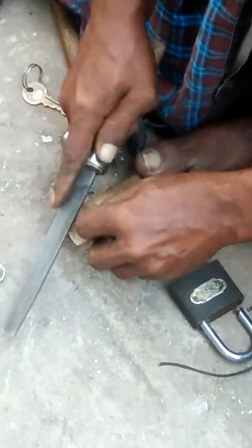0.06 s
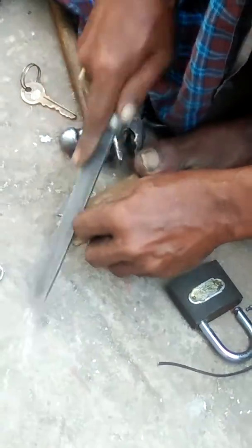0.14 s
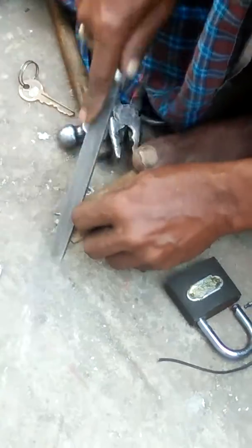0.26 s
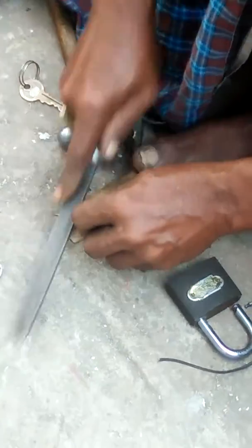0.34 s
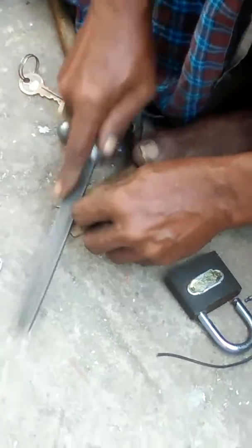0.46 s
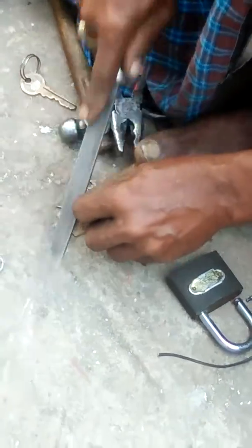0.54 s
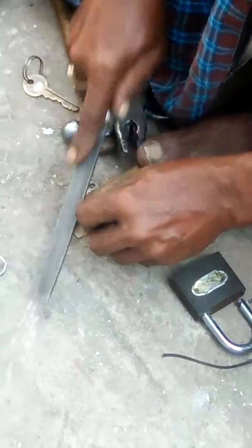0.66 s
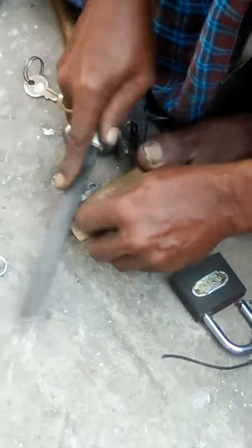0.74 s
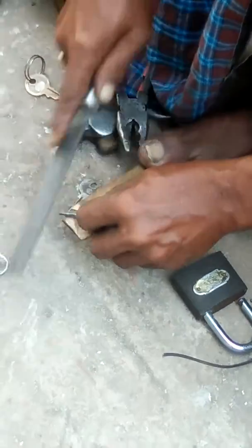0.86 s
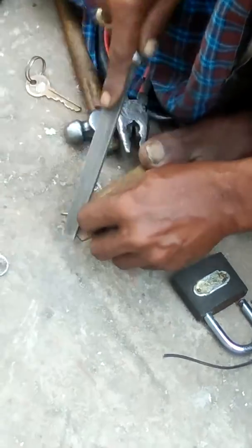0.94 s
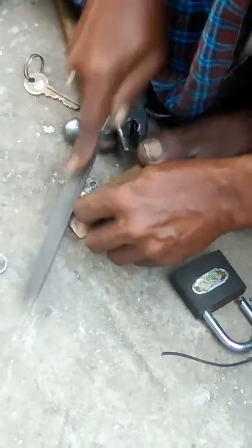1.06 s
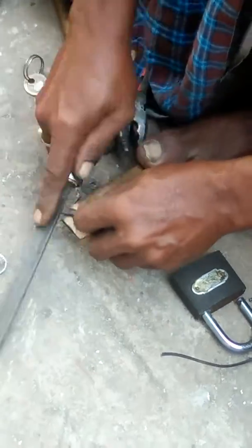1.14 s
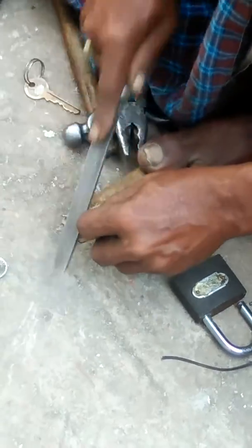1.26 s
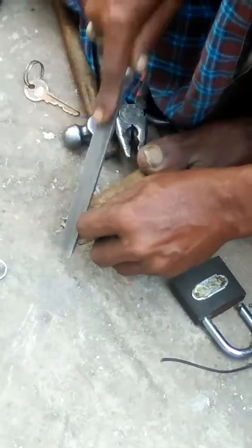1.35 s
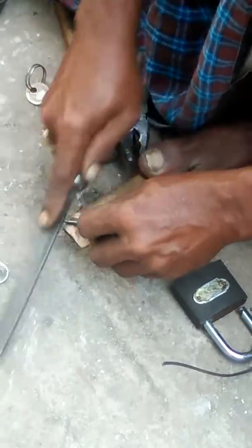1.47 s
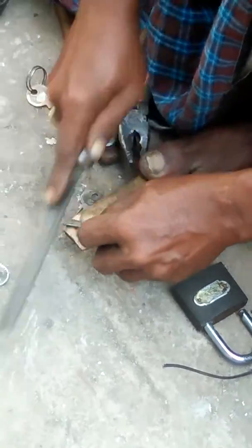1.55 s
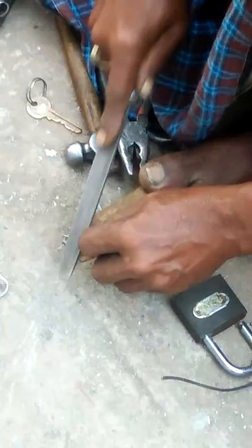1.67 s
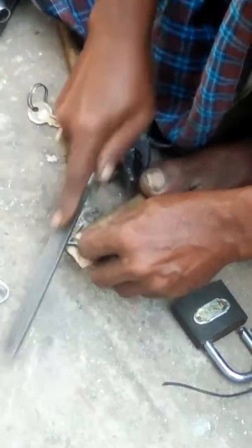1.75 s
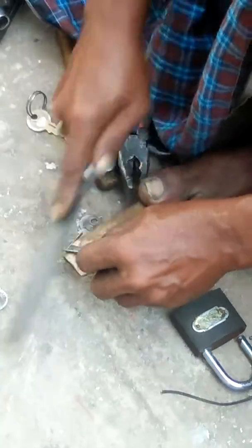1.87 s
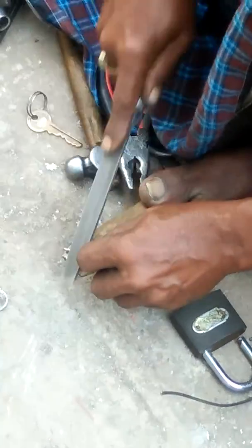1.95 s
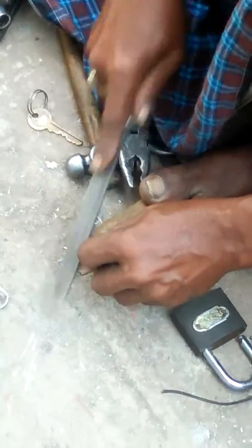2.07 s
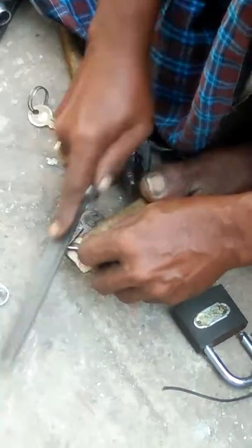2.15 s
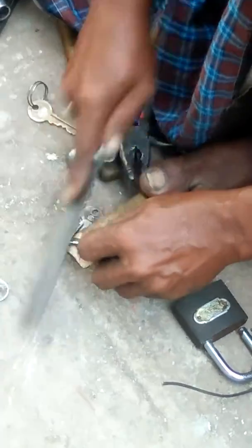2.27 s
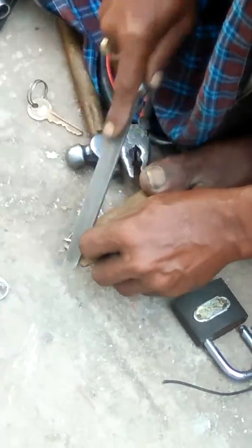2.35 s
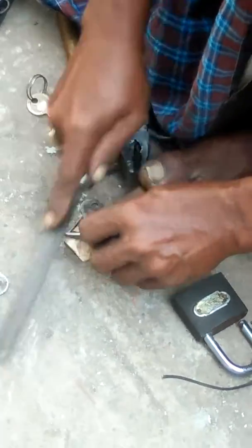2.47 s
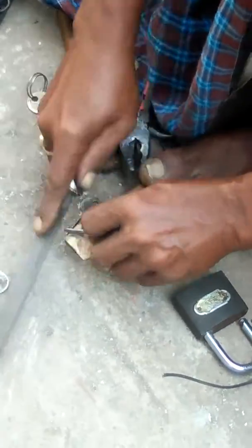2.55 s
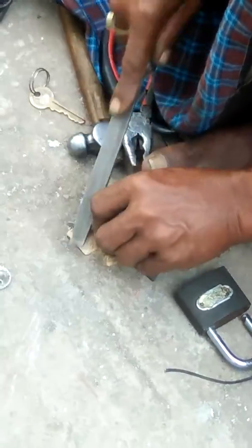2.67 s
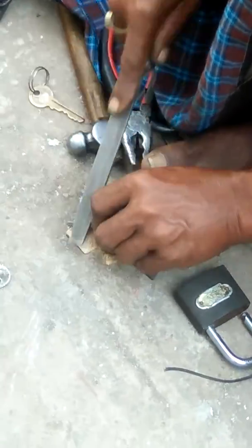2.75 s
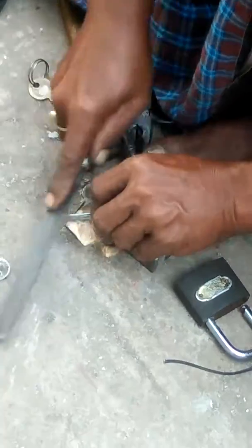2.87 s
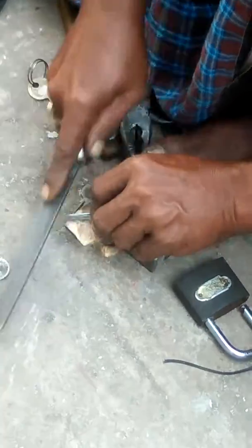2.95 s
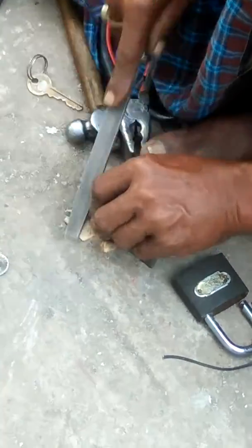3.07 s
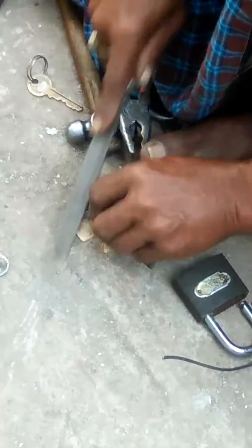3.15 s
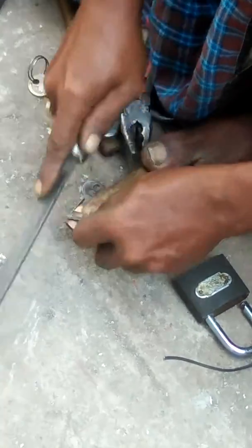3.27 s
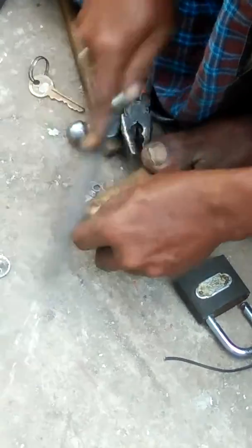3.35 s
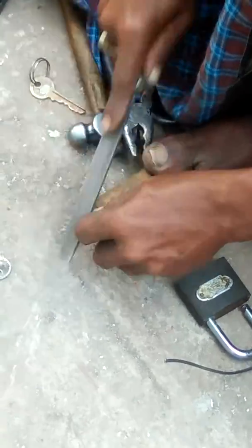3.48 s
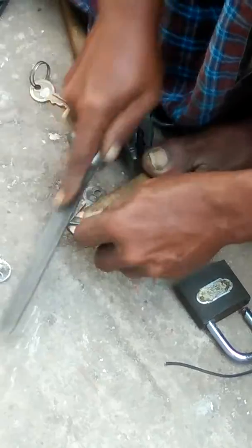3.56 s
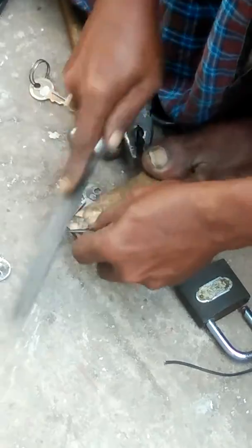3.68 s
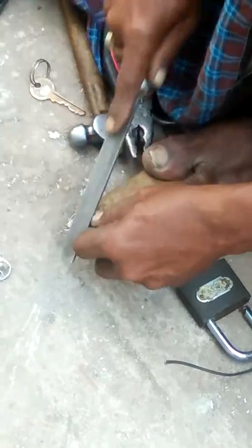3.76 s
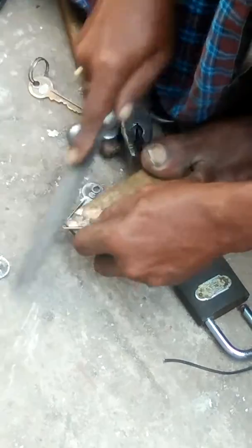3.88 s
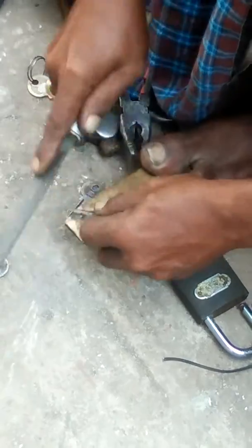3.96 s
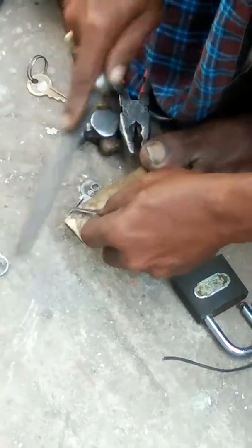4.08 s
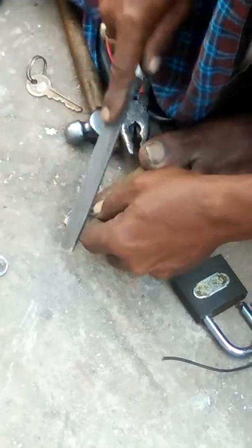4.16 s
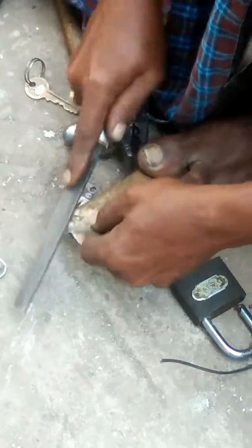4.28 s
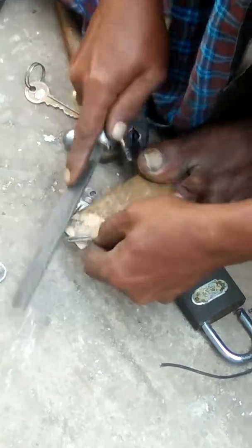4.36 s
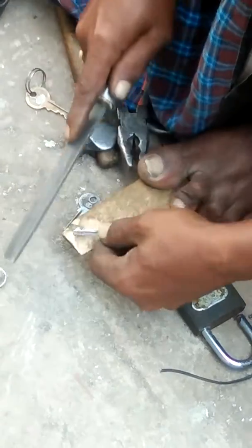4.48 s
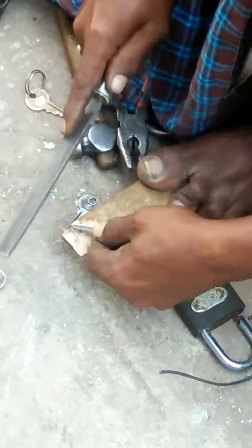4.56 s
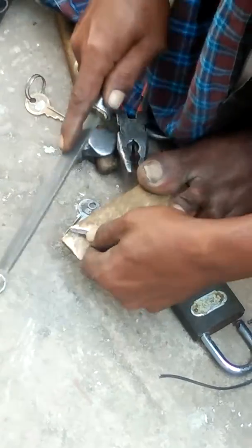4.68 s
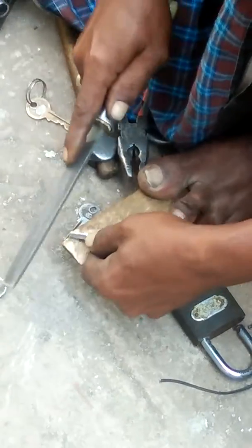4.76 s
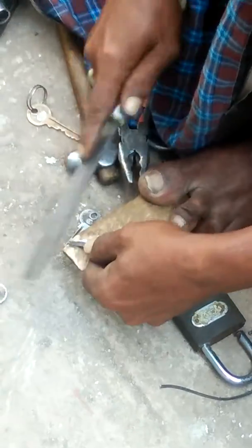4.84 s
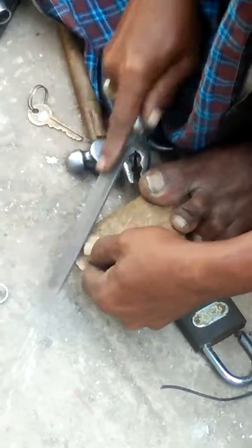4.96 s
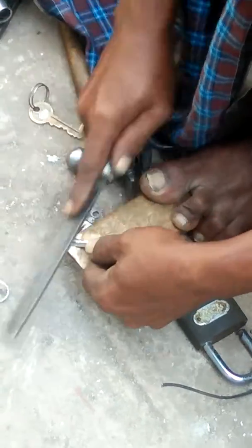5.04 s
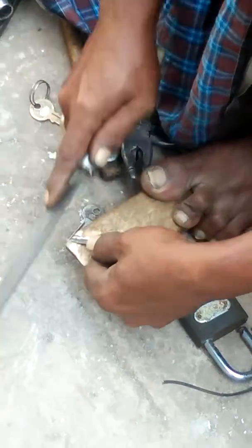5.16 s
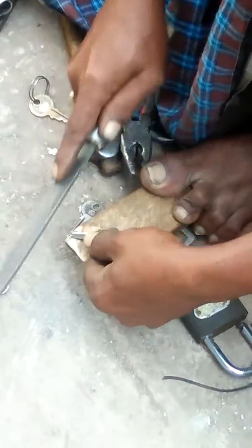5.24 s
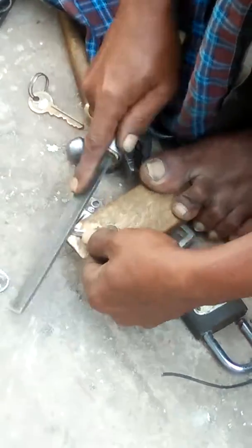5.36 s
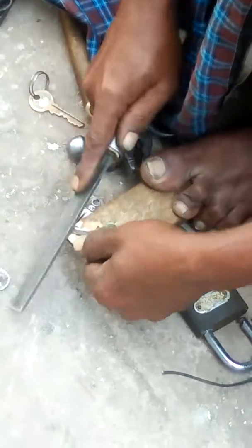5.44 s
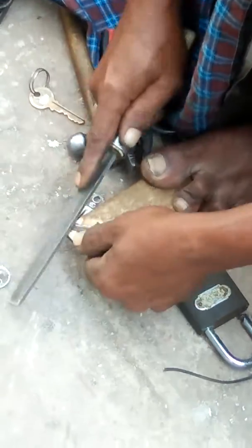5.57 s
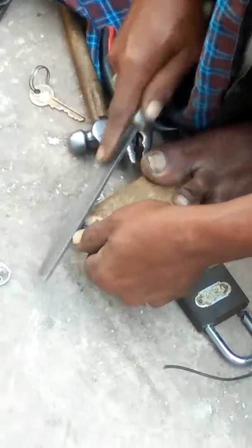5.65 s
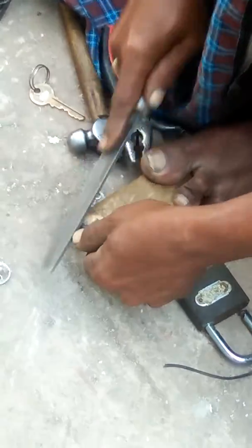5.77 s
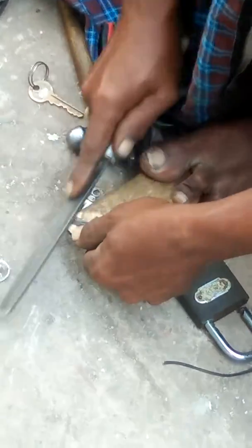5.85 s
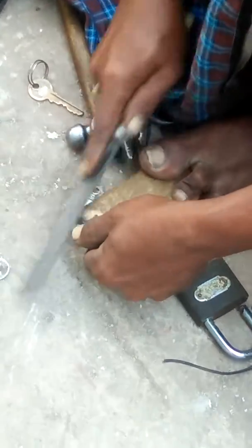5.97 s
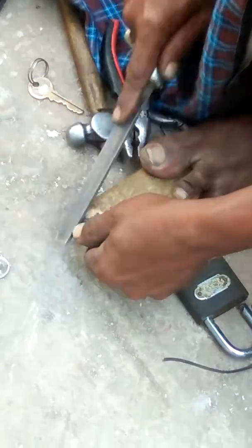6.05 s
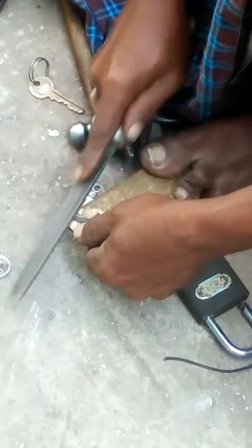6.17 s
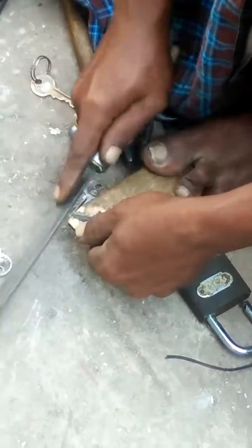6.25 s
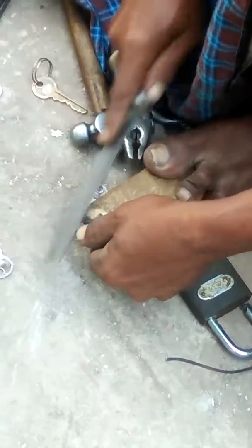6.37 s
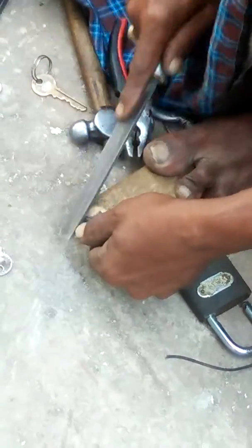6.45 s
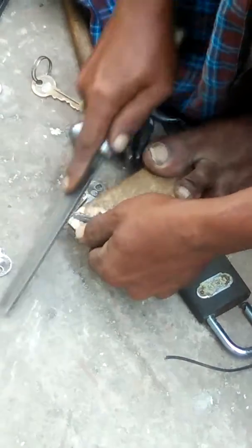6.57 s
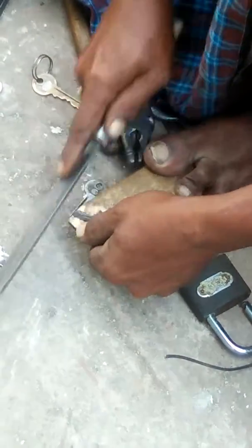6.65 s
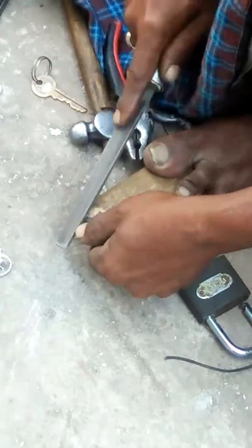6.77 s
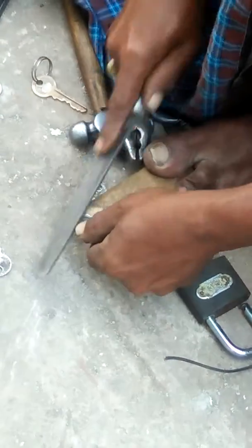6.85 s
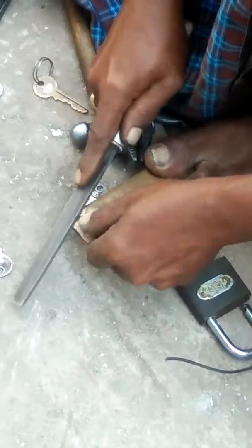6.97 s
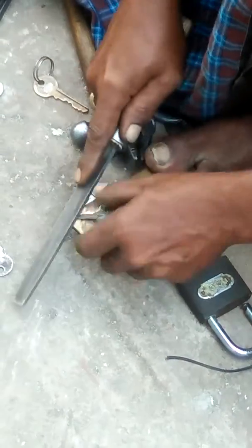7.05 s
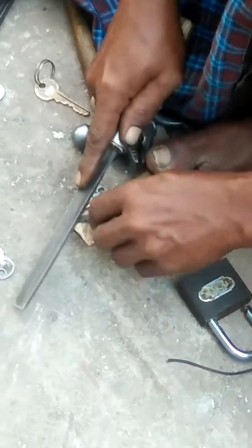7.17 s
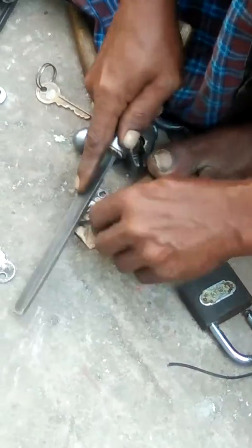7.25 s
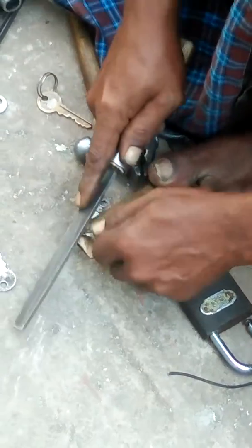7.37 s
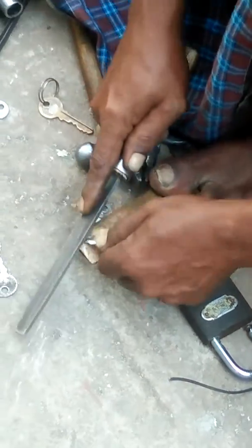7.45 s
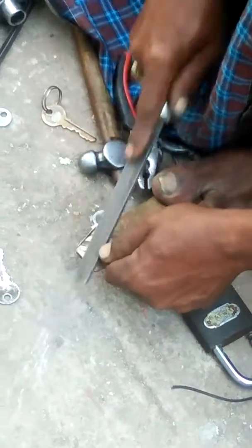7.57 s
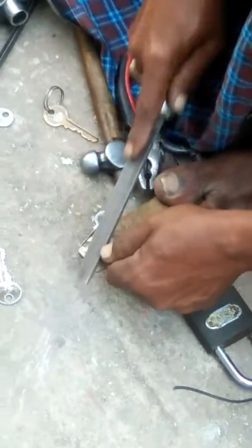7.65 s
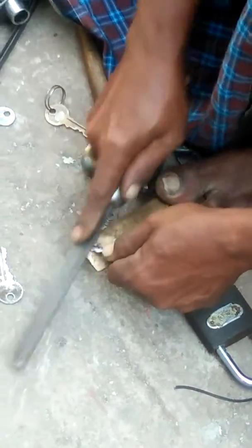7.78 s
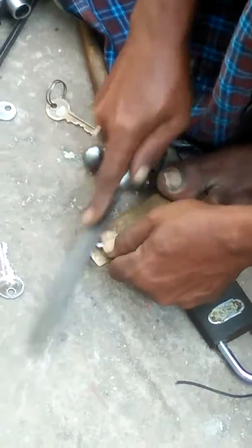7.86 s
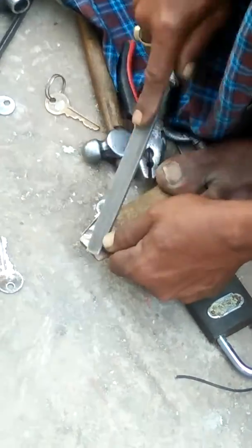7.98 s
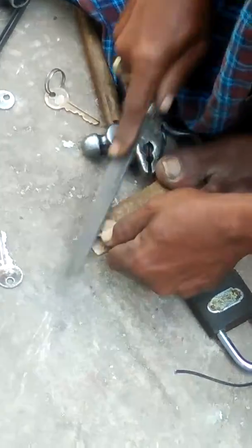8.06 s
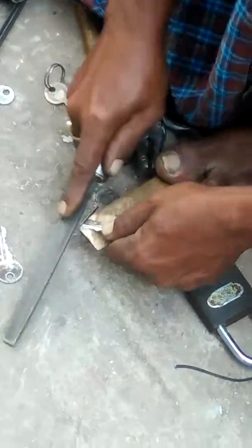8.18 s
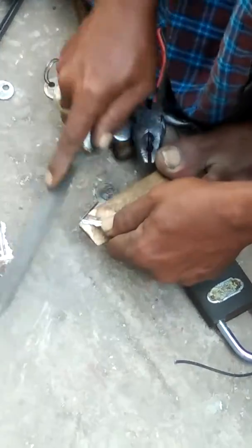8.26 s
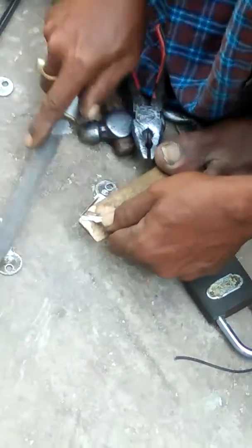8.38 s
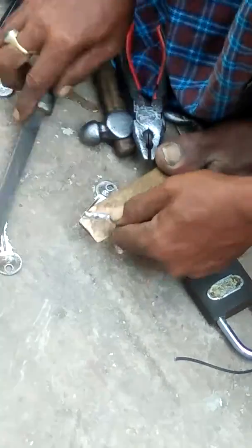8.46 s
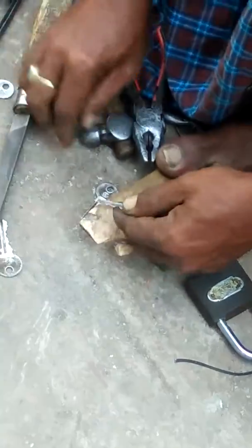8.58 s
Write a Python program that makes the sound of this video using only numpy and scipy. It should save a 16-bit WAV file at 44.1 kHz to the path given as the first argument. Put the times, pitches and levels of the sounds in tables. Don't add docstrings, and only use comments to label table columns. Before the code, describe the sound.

Close, dry hand filing of a thin metal key: fast scratchy strokes, growing sparser and softer, small clicks, then a tiny tinkle of loose keys.

```python
import sys
import numpy as np
from scipy import signal
from scipy.fft import rfft, irfft, next_fast_len
from scipy.io import wavfile
from scipy.ndimage import uniform_filter1d, map_coordinates

SR = 44100
rng = np.random.default_rng(int(sys.argv[2]) if len(sys.argv) > 2 else 0)


def invert_db(x):
    u = np.asarray(x, float) / 20
    return 10 ** u


def wav_out(sig):
    wavfile.write(sys.argv[1], SR, np.round(np.clip(np.atleast_2d(sig).T, -1, 1) * 32767).astype(np.int16))


N = 380141
T = np.arange(N) / SR

# f/Hz, level/dB per Hz
STREET_SPECTRUM = [(120, -21.5), (200, -14), (310, -7), (380, -14), (460, -2.5), (530, -16), (600, -2),
                   (1300, -2.5), (1600, -4.5), (2000, -6.5), (2600, -19), (4200, -32), (14500, -55)]
# f/Hz, level/dB per Hz
RUMBLE_SPECTRUM = [(12, -48.5), (20, -24), (30, -16), (64, -4.5), (134, -15.5), (200, -23.5), (260, -36.5),
                   (340, -44), (570, -120)]
# f/Hz, level/dB
HUM_LINES = [(300, -84), (460, -83), (590, -81), (790, -82), (1000, -83), (1200, -82), (1600, -83)]
# t/s, f/Hz, level/dB
WHINE_PATH = [
    (6.8, 1458, -82),
    (7.0, 1455, -82),
    (7.6, 1437, -87),
    (7.9, 1500, -85),
]
# t/s, level/dB
ENGINE_LEVEL = [
    (0, -47.5),
    (.05, -50),
    (.12, -46),
    (.3, -43),
    (.55, -52),
    (.8, -51),
]
# f/Hz, width/Hz, level/dB
EXHAUST_MODES = [(744, 23, 1.5), (900, 110, -9), (1500, 146, -9), (1625, 37, -1.5), (2463, 62, -18.5),
                 (4200, 900, -34)]
# t/s, level/dB
TRAFFIC_LEVEL = [(0.0, -73), (3.53, -74), (4.54, -79), (4.95, -79.5), (5.7, -75.5), (6.67, -72),
                 (7.25, -78.5), (7.45, -76.5), (7.6, -77), (8.0, -73), (8.62, -80.5)]
# t/s, level/dB
GUST_LEVEL = [(0.0, -83), (0.41, -63), (0.43, -55), (0.53, -70), (0.55, -61), (0.96, -79), (1.22, -71),
              (2.59, -76.5), (2.71, -69), (3.31, -79), (3.43, -67.5), (3.89, -76), (3.94, -62),
              (4.59, -81.5), (7.06, -71), (7.42, -78), (8.43, -70), (8.62, -85)]
# f/Hz, t60/s
YARD_T60 = [(500, 0.34), (1200, 0.41), (3000, 0.34), (5000, 0.24), (7000, 0.17), (14000, .13)]
# f/Hz, side minus mid/dB
SIDE_SPREAD = [(200, -68), (700, -80), (3000, -80), (4600, -36), (5600, -16), (7000, -7), (14000, -9)]
# f/Hz, level/dB per Hz
HISS_SPECTRUM = [(3000, -33), (5000, -17), (7000, -5.5), (10000, 0), (14500, -9)]
# t/s, peak/dB
TINKLES = [
    (8.518, -35.5),
    (8.534, -37),
    (8.54, -37.5),
    (8.551, -42),
    (8.558, -44),
    (8.564, -46),
    (8.569, -42.5),
    (8.578, -50),
]
# f/Hz, t60/s, level/dB
LOOSE_KEY_MODES = [(2930, 0.014, 9.5), (3180, .015, 3), (4000, 0.027, -10), (5230, 0.015, -18),
                   (7195, .025, -26.5), (9100, 0.015, -18)]
# t/s, f/Hz, level/dB, t60/s
RINGS = [
    (6.508, 7195, -51, .16),
    (6.508, 12350, -66, .06),
    (6.506, 9600, -66, .04),
    (6.866, 7195, -53, .12),
    (6.864, 9900, -64, .07),
    (6.864, 12400, -70, .05),
    (8.545, 9560, -64, .15),
    (8.556, 7195, -69, .2),
]
# t/s, peak/dB, then block, edge, swarf minus peak/dB
TAPS = [(0.1607, -26.5, 1.5, -5, -10.5), (0.6044, -25, -15, -5, -13), (1.065, -19, -21, -11, -24),
        (1.738, -20, -5, -8, -20.5), (2.0843, -22, -31, -6, -17.5), (2.8046, -28.5, 5.5, -5, -30.5),
        (3.5543, -18, -11, -13, -14), (3.903, -20, -19, -4, -21), (4.3214, -28, 7.5, -28, -28),
        (5.0764, -33.5, 13, -28.5, -28), (5.5271, -24, 8.5, -21, -31.5), (6.1364, -36, -19, -0.5, -12),
        (6.1729, -33, 0, -21, -32), (6.5005, -34.5, -16, -4, -8.5), (6.573, -25, -22, -18, -20),
        (6.7424, -25, 0, -18, -33), (6.7512, -21, -28, -24, -32), (6.8414, -37, -11, 3, -23),
        (6.861, -34.5, -15, -0.5, -5), (6.9111, -16.5, 1.5, -12, -24.5)]
# f/Hz, width/Hz, level/dB
BLOCK_MODES = [(803, 120, 3.5), (1033, 236, 5), (1212, 76, -1.5), (1390, 300, -2)]
# f/Hz, width/Hz, level/dB
KEY_MODES = [(1910, 170, -6), (2230, 150, -5), (2600, 220, -3), (2970, 260, -.5), (3300, 210, -4.5)]
# f/Hz, width/Hz, level/dB
TIP_MODES = [(3720, 180, -4), (3950, 220, 0.8), (4300, 220, -2)]
# f/Hz, width/Hz, level/dB
EDGE_MODES = [(4550, 260, 0.5), (4775, 161, 4), (5100, 130, -1.5), (5790, 180, -5.5)]
# f/Hz, width/Hz, level/dB
SWARF_MODES = [(6130, 189.6, 5.5), (6590, 460, 5), (7074, 260, -3), (8700, 530, -5.5), (10490, 550, -6),
               (11400, 400, -11), (13100, 900, -9)]
# start/s, end/s, from/Hz, to/Hz, level/dB
SINGING = [(0.232, 0.29, 940, 1230, -30.5), (0.403, 0.444, 1002, 1300, -31),
           (0.473, 0.538, 1997, 1540, -25.5), (0.583, 0.64, 1037, 923, -29),
           (0.757, 0.824, 1066, 1430, -29), (1.348, 1.411, 1011, 1120, -23),
           (1.503, 1.562, 4810, 5100, -27), (2.546, 2.604, 4670, 5000, -23), (5.95, 6.03, 4730, 4800, -41),
           (1.85, 1.895, 4750, 4980, -26), (2.192, 2.263, 4803, 5170, -28.5),
           (2.551, 2.644, 1500, 1960, -39.5), (3.01, 3.05, 2290, 2334, -21.5),
           (3.309, 3.359, 1166, 1534, -21.5), (3.649, 3.738, 900, 1993, -29.5),
           (4.377, 4.447, 972, 1250, -29.5), (7.674, 7.738, 802, 1018, -27.5),
           (7.841, 7.903, 900, 1147, -28.5), (1.557, 1.625, 5060, 4950, -35), (1.75, 1.81, 1006, 1250, -32),
           (2.09, 2.135, 2850, 2950, -25.5), (2.42, 2.516, 1323, 1250, -30), (2.745, 2.804, 590, 610, -51),
           (2.898, 2.967, 1250, 1420, -25.5), (3.062, 3.104, 2320, 2290, -37),
           (5.82, 5.885, 1050, 1250, -40), (6.278, 6.335, 4650, 4750, -36), (6.35, 6.395, 1250, 1320, -34),
           (7.85, 7.96, 4730, 4850, -42), (8.221, 8.3, 4700, 4780, -41), (8.201, 8.3, 945, 1250, -34),
           (0.292, 0.345, 900, 860, -29), (3.172, 3.21, 1250, 953, -32.5), (3.66, 3.69, 4800, 4840, -38),
           (3.73, 3.77, 1250, 947, -30), (6.69, 6.74, 1050, 1000, -33), (6.65, 6.7, 4600, 4690, -40),
           (3.555, 3.61, 2700, 2807, -38)]
# lands/s, loudest/s, lifts/s, key/dB,
# block minus key/dB
DRAWS = [(0.19, 0.253, 0.38, -27.5, -4.5), (0.543, 0.618, 0.74, -27.5, -5.5),
         (1.07, 1.077, 1.128, -32, -9.5), (1.337, 1.349, 1.479, -27.5, -9.5),
         (1.728, 1.751, 1.832, -26, -5.5), (2.075, 2.099, 2.156, -24, -6),
         (2.416, 2.428, 2.515, -22.5, -17.5), (2.806, 2.811, 2.897, -27.5, -16),
         (3.168, 3.179, 3.262, -30.5, -3), (3.545, 3.571, 3.66, -33.5, -2.5),
         (3.893, 3.913, 3.975, -31.5, -4), (5.768, 5.845, 5.91, -40.5, 3), (6.184, 6.188, 6.254, -35, -1),
         (6.565, 6.589, 6.625, -39.5, -3.5), (7.651, 7.715, 7.81, -30, -5.5),
         (8.022, 8.057, 8.14, -30.5, -7), (4.324, 4.328, 4.375, -47, 1.5), (5.079, 5.083, 5.125, -49, 3),
         (5.531, 5.537, 5.61, -42, 2.5), (6.915, 6.92, 6.97, -39, .6)]
# lands/s, loudest/s, lifts/s, key/dB, block minus key/dB
PUSHES = [(0.399, 0.432, 0.54, -24, -11.5), (0.761, 0.773, 0.93, -32, -6.5),
          (1.141, 1.241, 1.29, -23.5, -17.5), (1.491, 1.571, 1.636, -24.5, -9),
          (1.829, 1.971, 1.99, -27.5, -9), (2.187, 2.289, 2.332, -26.5, -9.5),
          (2.534, 2.672, 2.68, -22.5, -13), (2.904, 2.99, 3.063, -22.5, -4.5),
          (3.273, 3.344, 3.41, -25.0, -5.5), (3.649, 3.76, 3.76, -31.5, -0.5), (4.0, 4.065, 4.086, -39, -4),
          (4.387, 4.441, 4.486, -35, -0.5), (5.137, 5.226, 5.266, -33.5, 2),
          (5.929, 6.024, 6.081, -32, 0.5), (6.278, 6.36, 6.42, -30, -1.2),
          (6.647, 6.749, 6.77, -30.5, -0.5), (6.982, 7.063, 7.115, -39, 0),
          (7.834, 7.887, 7.98, -31.5, 1.2), (8.201, 8.33, 8.365, -33.5, 0.5)]
# rise/dB, rise curve, fall/dB, fall curve, landing/dB per s
DRAW_SHAPE = (38.5, 1.65, 18.5, 3.8, 1170)
PUSH_SHAPE = (9.2, 4.7, 12.5, 0.97, 3000)
# landing/dB, middle/dB, lift/dB
DRAW_COLOUR = [(2.5, 0.5, 3.5), (-9, -9.5, -15.5), (-19.5, -23, -24)]
PUSH_COLOUR = [(2.5, 1, 3.5), (-9, -7.5, -10.5), (-25, -22, -25)]
# tip/dB, edge/dB, extra edge bite at start/dB, swarf/dB
DRAW_TILT = [(3, 2.5, -4, 3), (2, 1, -8, 0.7), (-1.5, .1, 0.3, -2), (-7, -.4, -0.2, 0.5),
             (-0.5, -2.5, 2, 1), (0, -3, -2, -0.5), (1, 1, .1, -0.5), (-0.5, 1.5, 7, -1),
             (.1, 3.5, 0.6, -1), (-6, -0.5, 4, 3.5), (3.5, 5.5, -8, 4), (-8, -5, .1, -1.5),
             (-10, -12, .1, -3.5), (-13, -7, .1, -3), (-2, -5, .1, -4.5), (.1, 1, -5, 2.5),
             (-3, -5, .1, -5), (-3, -5, .1, -5), (-3, -3, .1, -5), (-4, -3, .1, -4)]
PUSH_TILT = [(2.5, 0.3, -8.5, 1), (0.2, -0.5, -1, -0.5), (2.5, 0, -1, -2.5), (-3, 0, 2, 1.5),
             (-4, -1.3, -1, 1), (-2.5, -2, 1, 1.5), (-2, 0.5, 0.5, -0.9), (0.6, 0.7, .1, -1.5),
             (-0.2, 0, -1.7, -0.3), (-5, 2, 1, 5), (.1, 4, -2.3, 3), (2.5, 1.2, -5, -3.5),
             (-10, 0.5, -2, .4), (.1, 1.5, .7, -3), (.1, 1.5, -2, -2.5), (1.5, .6, 4, -2.5),
             (-5.5, -6.5, -5, -4.5), (-4.5, 0.5, -5, 1), (-6, -2, 1.2, 4.5)]
# t/s, extra level/dB, half length/s
SURGES_AND_DIPS = [(0.258, 4.5, 0.0029), (0.471, 6.5, 0.025), (0.506, 10.5, 0.013), (0.641, 7.5, 0.0065),
                   (0.778, 5.5, 0.03), (1.215, 6, 0.035), (1.415, 4, 0.04), (2.615, 6.5, 0.0036), (3.03, 7, 0.013),
                   (3.332, 8.5, 0.011), (4.067, 5.5, 0.0061), (4.449, 13, 0.017), (5.985, 5.5, 0.005),
                   (6.34, 3.5, 0.0041), (7.712, 6.7, 0.0038), (7.929, 9, 0.027), (0.397, -3, 0.005),
                   (0.74, 6, 0.004), (2.189, 5, 0.004), (2.537, 4, 0.004), (3.271, 4, 0.004), (3.763, 5, 0.003),
                   (6.19, 3, 0.004), (7.742, 4, 0.005), (2.665, 4, 0.006), (1.12, -4, 0.012), (1.82, -4, 0.008),
                   (0.284, -2.4, 0.01), (0.338, 2.5, 0.01), (0.717, -3.1, 0.01), (1.2, 3.5, 0.01), (1.837, 3, 0.01),
           (1.981, -2.5, 0.016), (2.152, 2.6, 0.016), (2.202, -2.0, 0.026), (2.267, 3.8, 0.016),
           (2.421, -3.5, 0.01), (2.486, 2.5, 0.026), (2.563, 1.5, 0.016), (2.621, 2, 0.016),
           (2.676, -3.8, 0.006), (2.873, -2.5, 0.026), (2.976, 2.4, 0.026), (3.387, 4.4, 0.01),
           (3.591, 3.0, 0.016), (3.63, -7, 0.016), (3.685, -2.5, 0.016), (3.785, 6.5, 0.026),
           (3.976, -2.3, 0.04), (4.08, 3, 0.026), (4.445, -2.5, 0.01), (5.182, 2.6, 0.01),
           (5.206, -3.5, 0.01), (5.239, 2.5, 0.016), (6.009, 2, 0.026), (6.313, 1.9, 0.016),
           (6.42, -3, 0.016), (6.599, 5.5, 0.016), (6.677, 2.0, 0.04), (7.761, -3.0, 0.01), (7.78, 3, 0.01),
           (7.837, -3, 0.016), (8.145, 5, 0.026), (8.207, -3, 0.026), (8.328, 5.0, 0.01),
           (8.358, -3.5, 0.016), (7.035, 1.5, 0.016), (7.085, 4, 0.01), (0.212, 4.0, 0.008),
           (3.232, 2.5, 0.01)]
SKID_DB = (-21, -21.5, -32, -28)

JOLT_DB, JOLT_S = 2.5, .007
CUT_ENDS_DB = 7
LIFT_DB_PER_S = 900
TIP_DB = -6
TOP_HZ = 14500


def unit(x):
    return x / np.sqrt(np.mean(x ** 2) + 1e-20)


def along(points, hz):
    f, v = np.transpose(points)
    return np.interp(np.log(hz + 1), np.log(f + 1), v)


def over_time(points, **ends):
    return np.interp(T, *np.transpose(points), **ends)


def sine(hz):
    return np.sin(2 * np.pi * np.cumsum(hz) / SR)


def wobble(rate_hz):
    return map_coordinates(rng.standard_normal(int(N * rate_hz / SR) + 4), [T * rate_hz])


def filtered(x, response):
    m = next_fast_len(len(x) + SR // 2)
    return irfft(rfft(x, m) * response(np.fft.rfftfreq(m, 1 / SR)), m)[:len(x)]


def noise(spectrum):
    return unit(filtered(rng.standard_normal(N), lambda hz: invert_db(along(spectrum, hz))))


def resonance(hz, width_hz):
    return lambda f: (1j * f * width_hz / (hz * hz - f * f + 1j * f * width_hz)) ** 2


def rung(force, modes, width_scale):
    return sum(invert_db(db) * filtered(force, resonance(hz, width_scale * w)) for hz, w, db in modes)


def muffled(x):
    return signal.sosfilt(signal.butter(6, 5600, fs=SR, output="sos"), x)


def teeth(speed, top_hz, jitter, scatter_db):
    passed = np.cumsum(top_hz * speed * invert_db(1.2 * wobble(20))) / SR
    passed = passed + jitter * wobble(top_hz / 2)
    blows = np.abs(np.diff(np.floor(passed), prepend=0))
    return unit(blows * invert_db(scatter_db * rng.standard_normal(N)))


def patchy(x, depth_db):
    z = signal.stft(x, nperseg=1024)[2]
    field = uniform_filter1d(rng.standard_normal(z.shape), size=7, axis=0)
    field = uniform_filter1d(field, size=12, axis=1)
    return unit(signal.istft(z * invert_db(depth_db * unit(field)), nperseg=1024)[1][:N])


def engine():
    firing = teeth(np.ones(N), top_hz=90, jitter=.03, scatter_db=1.5) + 1.2 * rng.standard_normal(N)
    return invert_db(over_time(ENGINE_LEVEL, right=-120)) * unit(rung(firing, EXHAUST_MODES, 0.82))


def whine():
    s, hz, db = np.transpose(WHINE_PATH)
    level_db = np.interp(T, s, db + 19.0, -120, -120) + 1.5 * wobble(14)
    return invert_db(level_db) * sine(np.interp(T, s, hz))


def street():
    swell = invert_db(16 + over_time(TRAFFIC_LEVEL) - 1.5 + .6 * wobble(6))
    traffic = swell * patchy(noise(STREET_SPECTRUM), depth_db=2.6)
    hum = sum(invert_db(db + 3.5 * wobble(10)) * sine(hz * (1 + .02 * wobble(5.4))) for hz, db in HUM_LINES)
    rumble = invert_db(over_time(GUST_LEVEL) + 3.2 * wobble(11)) * noise(RUMBLE_SPECTRUM)
    return traffic + hum + rumble + whine() + engine()


def yard(x):
    out, step = np.zeros(N + 2 * SR), SR // 10
    x = np.pad(x, (step + 250, 2 * step))
    for i in range(0, N + step, step):
        hz, t, z = signal.stft(rng.standard_normal(SR // 2), SR, nperseg=256)
        decay = invert_db(-60 * t / along(YARD_T60, hz)[:, None])
        tail = signal.istft(z * decay, SR, nperseg=256)[1]
        wet = signal.fftconvolve(x[i:i + 2 * step] * np.hanning(2 * step), tail / np.linalg.norm(tail))
        out[i:i + len(wet)] += wet
    return out[step:step + N]


def tinkles():
    out, t = np.zeros(N + SR), T[:SR // 5]
    chinks = [(s, hz, db + mode_db + rng.normal(0, 2.4), t60)
              for s, db in TINKLES for hz, t60, mode_db in LOOSE_KEY_MODES]
    onset = 1 - np.exp(-t / .0011)
    for s, hz, db, t60 in [*chinks, *RINGS]:
        out[round(s * SR):][:len(t)] += invert_db(db - 60 * t / t60) * np.sin(2 * np.pi * hz * t) * onset
    return out[:N]


def taps():
    large, swarf, t = np.zeros(N + SR), np.zeros(N + SR), T[:SR // 10]
    bodies = [(KEY_MODES, large), (BLOCK_MODES, large), ([*TIP_MODES, *EDGE_MODES], large), (SWARF_MODES, swarf)]
    for s, db, *rel_db in TAPS:
        rough = rng.standard_normal(len(t))
        click = invert_db(-60 * t / .0035) * rough + 3 * (t == t[12])
        levels_db = db + np.array([0, *rel_db]) + [-1.5, 0.3, 1.5, -2.0]
        for (modes, out), level_db, skid_db in zip(bodies, levels_db, SKID_DB):
            skid = invert_db(skid_db - 60 * t / 0.19) * (1 - np.exp(-t / .002)) * rough
            knock = rung(click + skid, modes, 1.69)
            out[round(s * SR):][:len(t)] += invert_db(level_db) * knock / np.abs(knock).max()
    return (muffled(large) + swarf)[:N]


def singing():
    out, waver_rad, flutter = np.zeros(N), 1.1 * wobble(260), invert_db(3 * wobble(150))
    for start, end, from_hz, to_hz, db in SINGING:
        on = slice(round(start * SR), round(end * SR))
        u = (T[on] - start) / (end - start)
        hz = from_hz + (to_hz - from_hz) * np.sin(np.pi / 2 * u)
        swell = np.sqrt(np.abs(np.sin(np.pi * u)))
        tone = np.sin(2 * np.pi * np.cumsum(hz) / SR + waver_rad[on])
        out[on] += invert_db(db) * swell * flutter[on] * tone
    return out


def body(force, modes, shift_db, rate_hz):
    sound = sum(rung(force * invert_db(shift_db * wobble(rate_hz)), [mode], 2) for mode in modes)
    return map_coordinates(sound, [np.arange(N) + 45 * wobble(11)], mode="nearest")


def steady(x):
    power = uniform_filter1d(uniform_filter1d(x ** 2, size=1300), size=1300)
    return x / np.sqrt(np.abs(power) + 1e-12)


def stroke(row, tilt, shape, colour, bites):
    lands, loudest, lifts, key_db, block_db = row
    rise_db, rise_curve, fall_db, fall_curve, land_db_per_s = shape
    tip_db, bright_db, bite_db, swarf_db = tilt
    on = slice(round((lands - .03) * SR), round((lifts + .09) * SR))
    t = T[on]
    before = np.clip((loudest - t) / max(loudest - lands, .003), 0, 1)
    after = np.clip((t - loudest) / (lifts - loudest), 0, 1)
    level_db = key_db - rise_db * before ** rise_curve - fall_db * after ** fall_curve
    level_db -= land_db_per_s * np.maximum(lands - .004 - t, 0)
    level_db -= LIFT_DB_PER_S * np.maximum(t - lifts, 0)
    level_db += bites * JOLT_DB * np.exp(-np.maximum(t - lands, 0) / JOLT_S)
    u = np.clip((t - lands) / (lifts - lands), 0, 1)
    block, edge, swarf = (np.interp(u, (0, .5, 1), c) for c in colour)
    edge += bright_db + bite_db * np.maximum(1 - 2 * u, 0)
    swarf += swarf_db - CUT_ENDS_DB * after ** 3
    speed = .7 + .3 * np.sin(np.pi * u)
    return on, speed, level_db + [0 * u, 0 * u + TIP_DB + tip_db, block + block_db, edge, swarf]


def filing():
    levels_db, speed = np.full((5, N), -120.), np.ones(N)
    draws = [stroke(row, tilt, DRAW_SHAPE, DRAW_COLOUR, 0) for row, tilt in zip(DRAWS, DRAW_TILT)]
    pushes = [stroke(row, tilt, PUSH_SHAPE, PUSH_COLOUR, 0.98) for row, tilt in zip(PUSHES, PUSH_TILT)]
    for on, pace, dbs in draws + pushes:
        louder = dbs[0] > levels_db[0, on]
        levels_db[:, on] = np.where(louder, dbs, levels_db[:, on])
        speed[on] = np.where(louder, pace, speed[on])
    levels_db += sum(db * np.exp(-((T - s) / half_s) ** 2) for s, db, half_s in SURGES_AND_DIPS)
    blows = teeth(speed, top_hz=1350, jitter=.22, scatter_db=3)
    grit = invert_db(1.2 * wobble(300)) * rng.standard_normal(N)
    key = body(.5 * blows + grit, KEY_MODES, shift_db=3.2, rate_hz=22)
    tip = body(.5 * blows + grit, TIP_MODES, shift_db=4, rate_hz=25)
    block = body(blows + .7 * grit, BLOCK_MODES, shift_db=3, rate_hz=18)
    edge = body(.4 * blows + grit, EDGE_MODES, shift_db=3, rate_hz=22)
    swarf = body(.4 * blows + grit, SWARF_MODES, shift_db=3.5, rate_hz=12)
    chatter = invert_db(1.2 * wobble(120) + .6 * wobble(40))
    gains = uniform_filter1d(invert_db(levels_db - 0.54), size=90, axis=1)
    bodies = [steady(v) for v in (*muffled([key, tip, block, edge]), swarf)]
    return chatter * np.sum(gains * bodies, axis=0)


def scene():
    near = filing() + singing() + taps() + tinkles()
    near = filtered(near, lambda hz: (1j * hz / (520 + 1j * hz)) ** 4)
    return np.tile(near + invert_db(-9.5) * yard(near) + street(), (2, 1))


def roll_off(x):
    return signal.sosfilt(signal.butter(12, 15150, fs=SR, output="sos"), x)


def record(dry):
    z = signal.stft(dry[0], nperseg=128)[2]
    scrambled = z * np.exp(2j * np.pi * rng.random(z.shape))
    other = signal.istft(scrambled, nperseg=128)[1][:N]
    side = filtered(other, lambda hz: invert_db(along(SIDE_SPREAD, hz) + 5)) + invert_db(-97) * noise(HISS_SPECTRUM)
    mid = dry[0] + invert_db(-89) * noise(HISS_SPECTRUM)
    mid, side = (filtered(v, lambda hz: hz < TOP_HZ) for v in (mid, side))
    return roll_off(np.array([mid + side, mid - side]))


dry = scene()
out = record(dry)
wav_out(out)
```